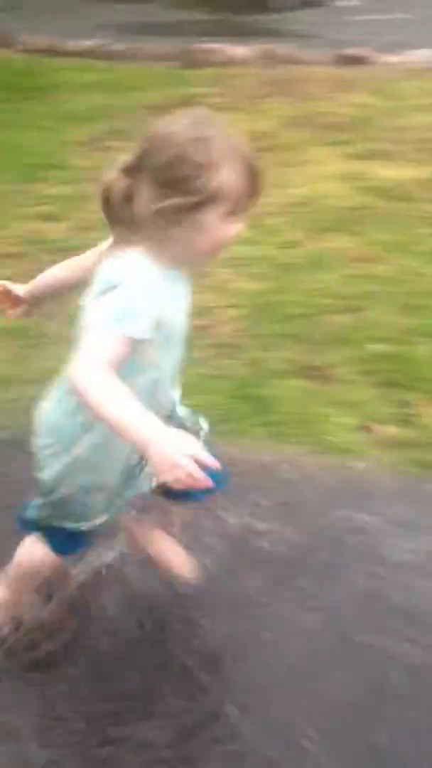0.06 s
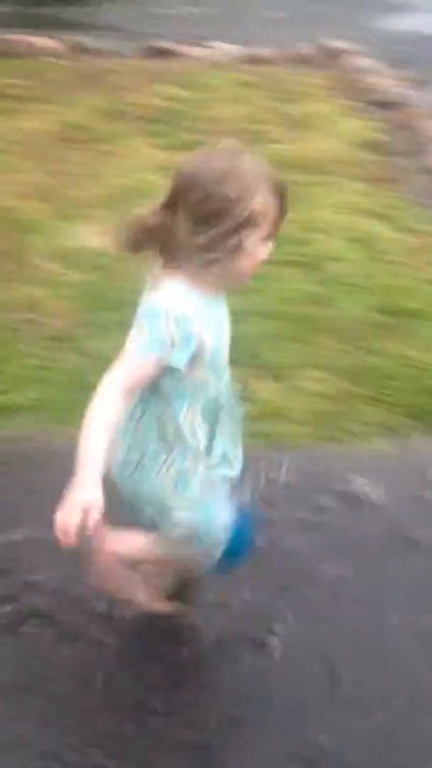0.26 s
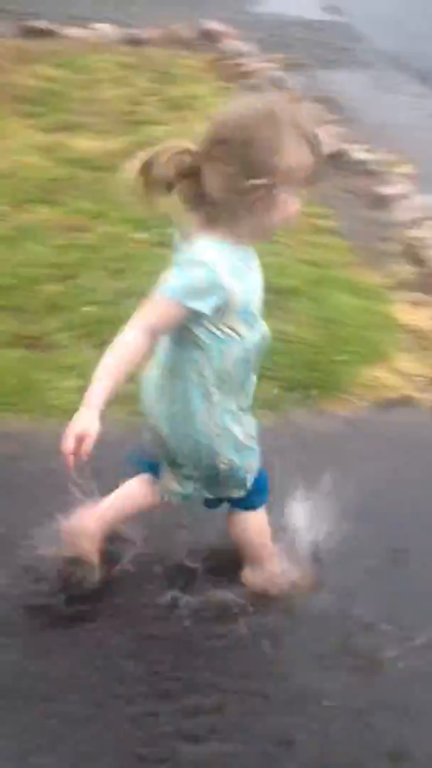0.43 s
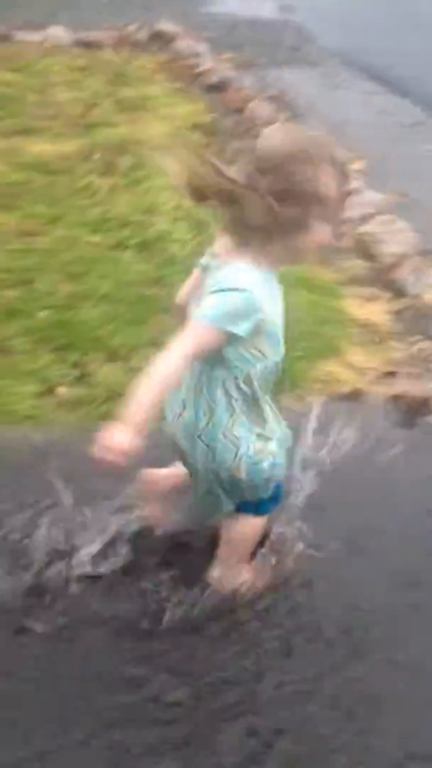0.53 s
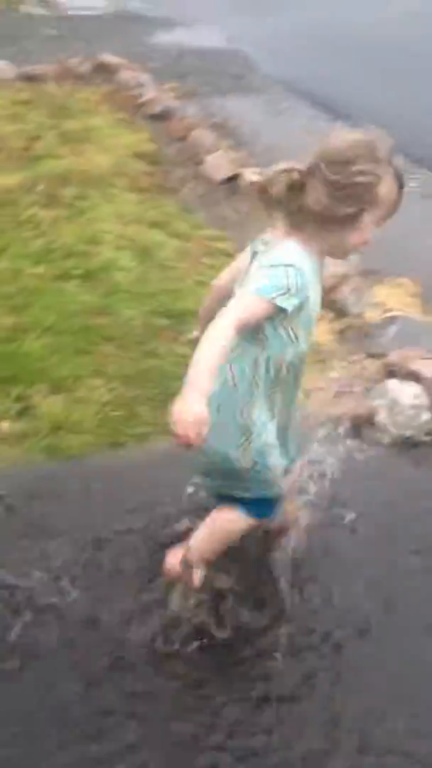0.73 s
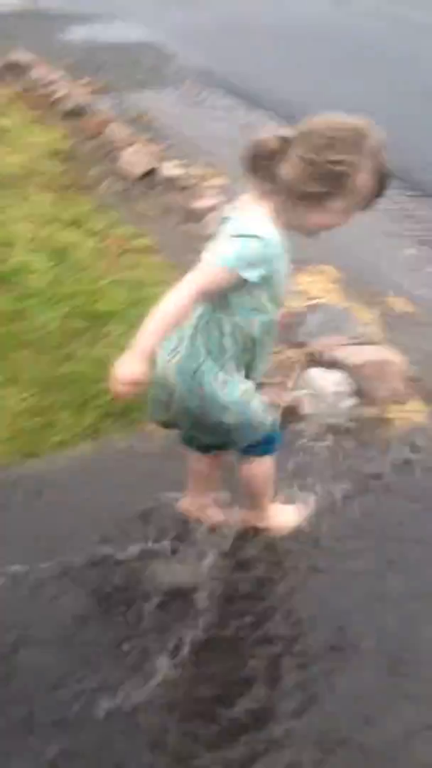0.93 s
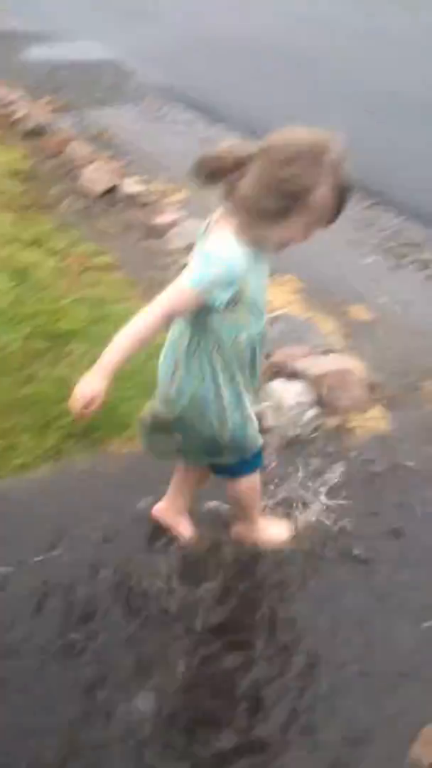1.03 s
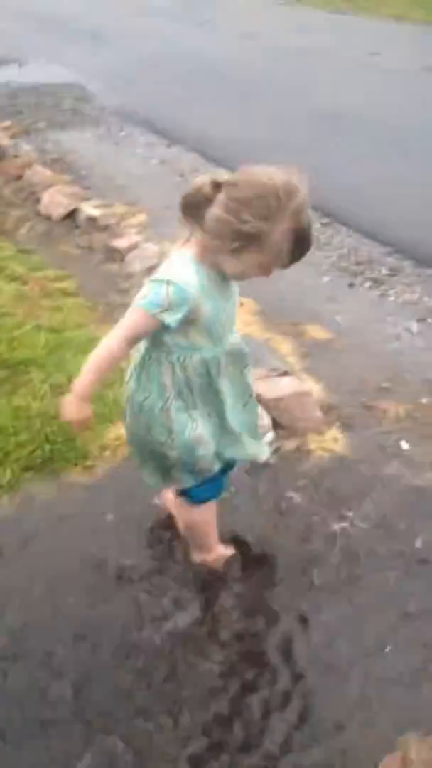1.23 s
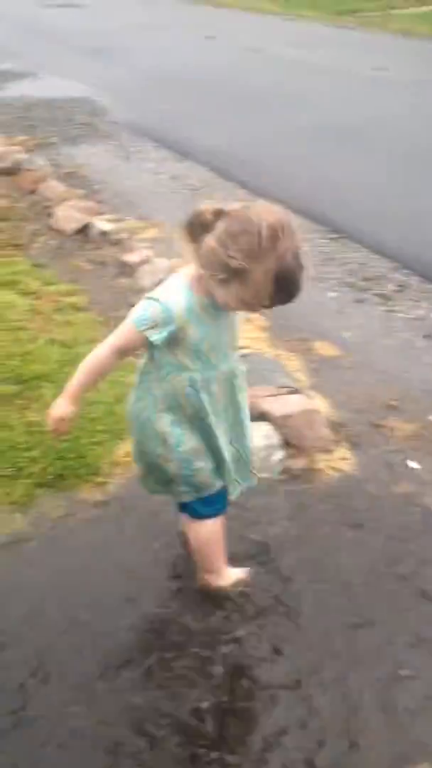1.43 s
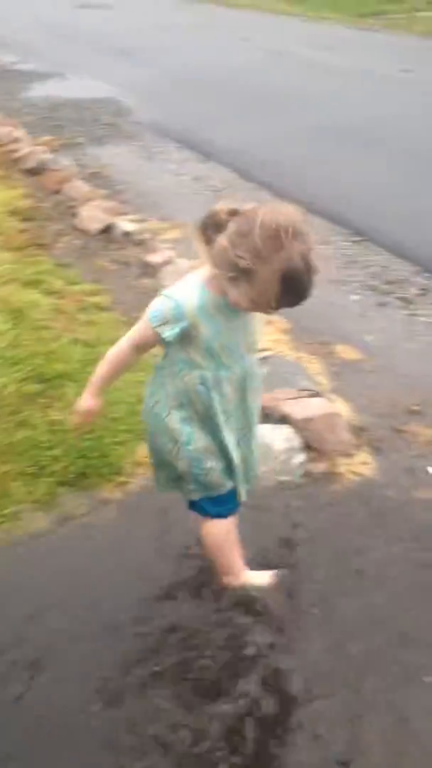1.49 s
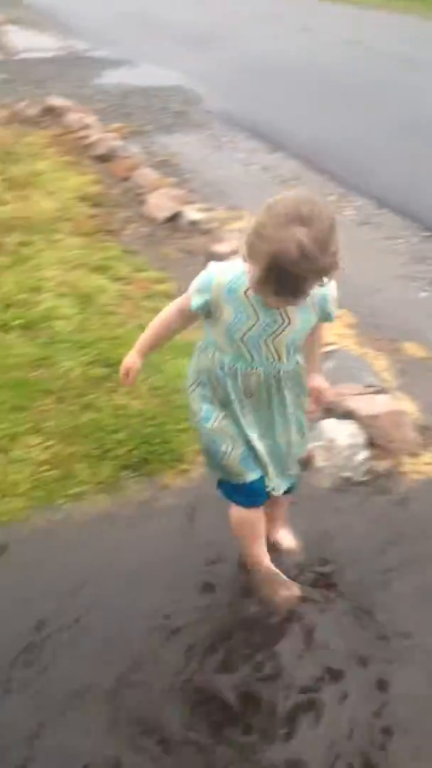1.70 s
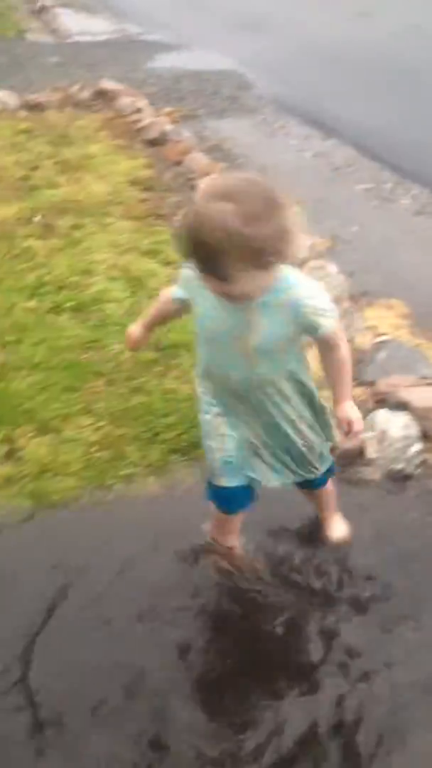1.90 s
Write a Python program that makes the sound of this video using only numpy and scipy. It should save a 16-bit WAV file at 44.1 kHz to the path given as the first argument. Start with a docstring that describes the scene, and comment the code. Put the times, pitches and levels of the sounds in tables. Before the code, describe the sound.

Feet splash through a shallow puddle outdoors, with light wind on the microphone.

```python
"""A small child wades barefoot through a shallow puddle on a paved drive.
From the start each kick throws a sheet of water that patters back as spray, while trapped air
plops and gurgles; the hardest lands near 0.4 s. Gusts buffet the microphone, most from 0.65 to 1.45 s.
After 1.3 s the steps grow gentle: soft sloshes and plops over a light breeze."""
import sys
import numpy as np
from scipy import signal
from scipy.fft import rfft, irfft
from scipy.io import wavfile
from scipy.ndimage import uniform_filter1d

SR = 44100
rng = np.random.default_rng(int(sys.argv[2]) if len(sys.argv) > 2 else 0)


def wav_out(sig):
    """Save sig, one row per channel (or a flat mono array), as 16-bit PCM at SR to the path in sys.argv[1]."""
    wavfile.write(sys.argv[1], SR, np.round(np.clip(np.atleast_2d(sig).T, -1, 1) * 32767).astype(np.int16))


N = 85995
T = np.arange(N) / SR

# thrown water falling back: time_s, level_db
SPRAY_LEVEL = [(0, -45), (.05, -50.5), (.10, -47), (.14, -41.5), (.19, -43.5), (.27, -40.5), (.35, -41),
               (.42, -41), (.49, -39), (.60, -43), (.68, -46.5), (.75, -50.5), (.87, -45.5), (.94, -50),
               (1.05, -43), (1.12, -45), (1.17, -51.5), (1.25, -49.5), (1.35, -55), (1.43, -60),
               (1.53, -63.5), (1.66, -71), (1.79, -65), (1.86, -61), (1.95, -55.5)]


def splashes(attack_s=0.0011):
    """Each sheet of water bursts into a dense, quickly dying crackle."""
    # sheets hitting the surface: start_s, level_db, decay_s
    sheets = [(.002, -48, 0.013), (0.137, -41.5, 0.022), (0.224, -37.5, 0.0084), (0.299, -40, 0.01),
              (.367, -35.5, 0.0033), (.382, -41.5, 0.036), (.434, -38, 0.025), (0.459, -41, 0.013),
              (0.531, -37, 0.0069), (0.567, -57, 0.0092), (0.639, -40, 0.012), (0.66, -45, 0.046),
              (.968, -48.5, 0.026), (1.012, -38.5, 0.012), (1.192, -42, 0.012), (1.221, -39, 0.0047)]
    # crackle spectrum: freq_hz, gain_db
    colour = [(900, -10.5), (1600, -5.5), (2400, 2), (3300, -1.5), (4500, -3), (7500, -7), (10000, -12.5),
              (15000, -19.5)]
    envelope = np.zeros(N)
    for start_s, db, decay_s in sheets:
        add(envelope, start_s, from_db(db) * (1 - np.exp(-T / attack_s)) * np.exp(-T / decay_s))
    crackle = grains(colour, per_s=9000, spread_db=2, cycles=2, rise=0.018, even_s=0.025)
    return from_db(7) * envelope * crackle


def sloshes(count=220, spread_oct=0.34, spread_db=7, attack_s=0.00067):
    """A shove of the foot breaks into a cluster of short bubbles around one pitch."""
    # water pushed aside: start_s, level_db, decay_s, centre_hz
    shoves = [(.140, -40.5, 0.016, 920), (0.192, -41, 0.016, 670), (.370, -28, 0.0086, 970),
              (.389, -31.5, 0.017, 796), (.522, -37.5, 0.048, 2040), (.625, -35, 0.032, 786),
              (.716, -43, 0.06, 2090), (.797, -45, 0.018, 666), (0.826, -40, 0.02, 1290),
              (.868, -43, 0.031, 960), (.968, -43, 0.0093, 2640), (1.108, -34.5, 0.01, 2040),
              (1.192, -38, 0.016, 1110), (1.293, -36.5, 0.014, 650), (1.565, -50, 0.026, 926),
              (1.713, -54.5, 0.01, 2700), (1.822, -50, 0.021, 990), (1.866, -49.5, 0.017, 2500),
              (1.872, -45, 0.044, 800)]
    out, t = np.zeros(N), T[:SR // 4]
    for start_s, db, decay_s, centre_hz in shoves:
        cluster = np.zeros(SR // 2)
        births_s = rng.uniform(0, t[-1], count)
        pitches, sizes = rng.standard_normal((2, count))
        for birth_s, pitch, size in zip(births_s, pitches, sizes):
            ring = bubble(centre_hz * 2 ** (spread_oct * pitch), cycles=2.7, rise=0.013, swell=0.23)
            add(cluster, birth_s, from_db(spread_db * size) * ring)
        cluster = evened(butter(cluster[:len(t)], centre_hz / 2, "high"), span_s=0.0206)
        envelope = (1 - np.exp(-t / attack_s)) * np.exp(-t / decay_s)
        add(out, start_s, from_db(db - 0.5) * cluster * envelope)
    return out


def plops():
    """Large pockets of air close and ring for a few cycles."""
    # air pockets: start_s, pitch_hz, level_db
    pockets = [(.029, 930, -29), (.1045, 1420, -26), (.193, 612, -32), (.2285, 1720, -18),
               (0.275, 1370, -21.5), (.314, 1210, -21), (.3728, 834, -15.5), (.3735, 482, -18),
               (0.3753, 1057, -19.5), (.380, 640, -18), (.3925, 850, -20), (.393, 492.5, -20.5),
               (.5745, 1700, -14), (0.727, 2080, -20.5), (.801, 670, -26), (.823, 1250, -23.5),
               (.880, 730, -24.5), (.903, 1770, -27), (1.116, 1870, -33), (1.195, 695, -30),
               (1.285, 1340, -31.5), (1.294, 700, -22), (1.400, 1420, -33), (1.432, 1640, -36),
               (1.565, 960, -38.5), (1.578, 1140, -41), (1.826, 685, -39), (1.903, 687, -32.5)]
    out = np.zeros(N)
    for start_s, hz, db in pockets:
        add(out, start_s, from_db(db) * bubble(hz, cycles=3.05, rise=0.031, swell=1.4))
    return out


def drops():
    """A falling drop leaves a tiny ringing bubble."""
    # drops hitting the puddle: start_s, pitch_hz, level_db
    impacts = [(.079, 3900, -21.5), (0.218, 4830, -20), (.228, 5900, -21.5), (.2485, 11500, -22),
               (0.371, 7400, -19), (0.37, 11500, -18), (0.382, 7600, -14.5), (0.439, 3020, -31),
               (0.463, 3630, -19), (.520, 5000, -25), (0.534, 2560, -41), (0.664, 2700, -25.5),
               (.770, 7350, -33), (0.8209, 4970, -21), (.985, 5530, -23), (1.203, 4800, -31),
               (1.2105, 4600, -19), (1.227, 4550, -29), (1.282, 5930, -32), (1.398, 6800, -36),
               (1.725, 6000, -32)]
    out = np.zeros(N)
    for start_s, hz, db in impacts:
        add(out, start_s, from_db(db + 4.5) * bubble(hz, cycles=2.21, rise=0.018, swell=1.5))
    return out


def spray():
    """Droplets patter back over a fine hiss."""
    # droplet spectrum: freq_hz, gain_db
    patter_colour = [(1000, -1), (1600, 3.5), (2400, 2.5), (3300, 1), (4500, -0.5), (7500, -7),
                     (10000, -5.5), (13000, -51)]
    # hiss spectrum: freq_hz, gain_db
    mist_colour = [(300, -10), (900, -22), (2200, -3), (4500, -1.5), (7500, -2), (10000, -5.5), (15000, -8)]
    patter = grains(patter_colour, per_s=5000, spread_db=3.5, cycles=4.7, rise=0.028, even_s=0.036,
                    count=28)
    return level(SPRAY_LEVEL) * (from_db(-1.5) * patter + from_db(-5) * noise(mist_colour))


def churn(low_hz=450):
    """Middle-sized bubbles gurgle in the wake of the feet."""
    # churned water: time_s, level_db
    wake = [(0, -46.5), (.07, -51.5), (.16, -46), (.30, -43), (.35, -50), (.40, -43.5), (.49, -57.5),
            (.55, -43.5), (.70, -46.5), (.77, -52.5), (.86, -43.5), (.94, -54), (1.08, -49.5),
            (1.16, -57.5), (1.26, -65), (1.40, -49), (1.48, -61.5), (1.65, -73.5), (1.79, -62), (1.95, -53)]
    # gurgle spectrum: freq_hz, gain_db
    colour = [(350, -14), (550, 3), (800, -6), (1200, -2), (1800, -9.5), (2600, -13.5), (4000, -29.5)]
    gurgle = grains(colour, per_s=1300, spread_db=6, cycles=4.35, rise=0.018, even_s=0.022)
    return from_db(2) * level(wake) * butter(gurgle, low_hz, "high")


def snaps(decay_s=0.0011):
    """Drops striking water, skin or paving give a sharp tick."""
    # drop impacts: start_s, level_db
    ticks = [(0.0766, -42), (.227, -28), (0.435, -30), (.569, -25.5), (.769, -32), (.968, -36),
             (1.015, -34), (1.101, -35), (1.177, -37.5), (1.210, -33.5), (1.279, -35.5), (1.339, -41),
             (1.369, -40.5), (1.399, -39), (1.432, -47)]
    # tick spectrum: freq_hz, gain_db
    colour = [(800, -7), (2500, -16), (6000, 0), (10000, -5.5), (15000, -22)]
    envelope, t = np.zeros(N), T[:SR // 40]
    for start_s, db in ticks:
        add(envelope, start_s, from_db(db) * np.exp(-t / decay_s))
    return envelope * noise(colour)


def flecks():
    """Tiny stray droplets tick sharply above the spray."""
    # stray droplet spectrum: freq_hz, gain_db
    colour = [(4000, -4), (7000, 3), (10500, -4), (14500, -4)]
    ticks = grains(colour, per_s=170, spread_db=5.5, cycles=2.3, rise=0.0089, even_s=0.22, count=8)
    return from_db(-12) * level(SPRAY_LEVEL) * ticks


def scatter(x, decay_s=0.0081, gap_s=0.003):
    """Brief, diffuse reflection off nearby ground, stones and walls."""
    t = T[:N // 8]
    tail = rng.standard_normal(len(t)) * np.exp(-t / decay_s) * (t > gap_s)
    return from_db(-15.5) * signal.oaconvolve(x, tail / np.linalg.norm(tail))[:N]


def gusts(low_hz=51, knee_hz=170):
    """Swirling air presses on the microphone port in short swells."""
    # gusts: crest_s, level_db, rise_s, fall_s, edge_hz
    swells = [(.12, -45.5, 0.09, 0.016, 170), (0.23, -31, 0.009, 0.0067, 118),
              (0.281, -32, 0.034, 0.015, 224), (0.674, -24.5, 0.02, 0.01, 647),
              (0.756, -28, 0.021, 0.011, 330), (0.821, -43, 0.0092, .012, 480),
              (.93, -31.5, 0.027, 0.022, 535), (1.019, -23.5, 0.015, 0.016, 450),
              (1.10, -43.5, 0.081, 0.036, 215), (1.362, -27.5, 0.017, 0.024, 400),
              (1.394, -24.5, 0.028, 0.01, 605), (1.449, -30, 0.012, 0.0052, 200),
              (1.585, -35, .03, 0.02, 190), (1.626, -35.5, 0.011, 0.015, 453),
              (1.853, -36.5, 0.0045, 0.0069, 278)]
    out = np.zeros(N)
    for crest_s, db, rise_s, fall_s, edge_hz in swells:
        swirl = butter(rng.standard_normal(N), knee_hz, "low", order=1)
        swirl = butter(swirl, edge_hz, "low", order=5)
        swirl = evened(butter(swirl, low_hz, "high", order=3), span_s=0.018)
        from_crest = np.abs(T - crest_s) / np.where(T < crest_s, rise_s, fall_s)
        out += from_db(db - 1) * swirl * np.exp(-np.minimum(from_crest, 20) ** 1.07)
    return out


def eddies(top_hz=820):
    """Single eddies pop on the port, one pressure swing each."""
    # pressure swings: centre_s, level_db, half_width_ms
    pops = [(0.23, -24.5, 2.35), (.275, -22, 1.43), (.666, -22.5, 2.5), (0.681, -4.5, 0.47),
            (0.682, -18, 1.44), (.932, -26, 0.55), (0.9793, -23, 1.63), (1.0138, -25, 2.3),
            (1.050, -23.5, 2.2), (1.342, -22, 1.64), (1.3658, -29, 1.2), (1.39, -18, 0.64),
            (1.404, -18, 1.08), (1.626, -30, 2.16)]
    out = np.zeros(N)
    for centre_s, db, half_width_ms in pops:
        u = np.clip((T - centre_s) * 1000 / half_width_ms, -10, 10)
        out += from_db(db) * u * np.exp((1 - u ** 2) / 2)
    return butter(out, top_hz, "low", order=6)


def breeze():
    """Light wind rumbles under the gusts."""
    # rumble strength: time_s, level_db
    rumble = [(0, -36), (.06, -67), (.12, -41.5), (.19, -53), (.30, -35), (.35, -58.5), (.58, -49),
              (.72, -40), (.84, -50.5), (1.0, -45), (1.17, -49), (1.24, -57), (1.28, -43.5), (1.5, -48.5),
              (1.66, -44), (1.78, -51.5), (1.95, -52.5)]
    # rumble spectrum: freq_hz, gain_db
    colour = [(25, -27), (50, 0.5), (95, 5), (150, -5.5), (250, -17), (500, -41), (900, -46.5)]
    return level(rumble) * noise(colour)


def air():
    """Faint, steady outdoor hush."""
    # hush spectrum: freq_hz, gain_db
    colour = [(100, 2), (400, 21.5), (900, 21.5), (2000, 6.5), (4000, -20), (9000, -32), (15000, -45)]
    return from_db(-63) * noise(colour)


def bubble(hz, cycles, rise, swell):
    """Damped sine, climbing as the bubble nears the surface; decay (cycles) and swell in periods."""
    age = np.arange(int(6 * cycles / hz * SR) + 2) * hz / SR
    phase = age + rise * age ** 2 / (2 * cycles)  # rise: share of pitch gained per decay time
    return np.sin(2 * np.pi * phase) * np.exp(-age / cycles) * (1 - np.exp(-age / swell))


def grains(colour, per_s, spread_db, cycles, rise, even_s, count=26):
    """Shower of bubbles of random size, dealt among count pitches; rms 1."""
    born = rng.random(N) < per_s / SR
    sizes = born * from_db(spread_db * np.minimum(rng.exponential(1, N), 4)) * rng.choice([-1, 1], N)
    pitch_index, out = rng.integers(0, count, N), np.zeros(N)
    for k, hz in enumerate(np.geomspace(colour[0][0], colour[-1][0], count)):
        ring = bubble(hz, cycles, rise, swell=0.9)
        out += signal.oaconvolve(sizes * (pitch_index == k), ring)[:N] * hz * from_db(at_hz(colour, hz))
    return rms_one(evened(out, even_s))


def noise(colour):
    """Coloured noise, rms 1."""
    hz = np.maximum(np.arange(N // 2 + 1) * SR / N, 1)
    return rms_one(irfft(rfft(rng.standard_normal(N)) * from_db(at_hz(colour, hz)), N))


def evened(x, span_s):
    """Hold the power steady over a span, keeping the finer grain."""
    power = np.abs(uniform_filter1d(x ** 2, max(int(span_s * SR), 2)))
    return x / np.sqrt(power + 1e-4 * np.mean(x ** 2))


def from_db(db):
    """Decibels to gain."""
    return 10 ** (np.asarray(db) / 20)


def rms_one(x):
    """Scale to unit power."""
    return x / np.sqrt(np.mean(x ** 2) + 1e-20)


def level(curve):
    """Gain over time from time_s, level_db points."""
    return from_db(np.interp(T, *np.transpose(curve)))


def at_hz(colour, hz):
    """Read a spectrum in dB on a log-frequency axis."""
    freq_hz, db = np.transpose(colour)
    return np.interp(np.log(hz), np.log(freq_hz), db)


def butter(x, hz, kind, order=2):
    """Causal low- or high-pass."""
    return signal.sosfilt(signal.butter(order, hz, kind, fs=SR, output="sos"), x)


def add(out, start_s, sound):
    """Mix a sound in at a time."""
    i = int(start_s * SR)
    out[i:i + len(sound)] += sound[:N - i]


def scene():
    """Water and its reflection, wind and outdoor air; mono."""
    water = spray() + splashes() + churn() + sloshes() + plops() + drops() + snaps() + flecks()
    return (water + scatter(water) + gusts() + eddies() + breeze() + air())[None]


def record(dry):
    """The microphone sheds the deepest bass; the top of the range is cut."""
    low_hz, top_hz = 42.4, 15500
    top_cut = signal.ellip(10, .2, 80, top_hz, fs=SR, output="sos")
    return signal.sosfilt(top_cut, butter(dry, low_hz, "high"))


dry = scene()
out = record(dry)
wav_out(out)
```